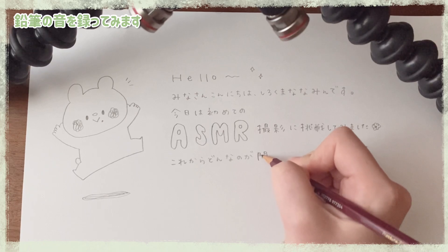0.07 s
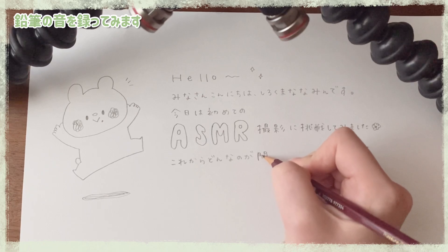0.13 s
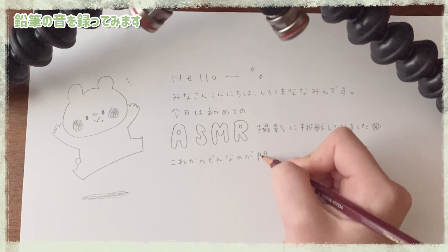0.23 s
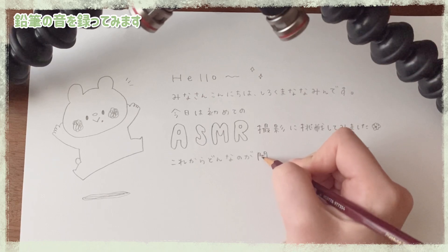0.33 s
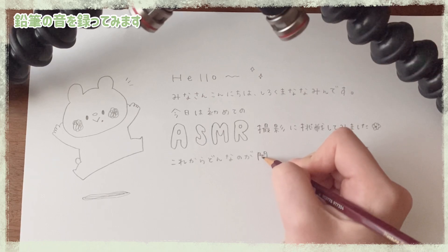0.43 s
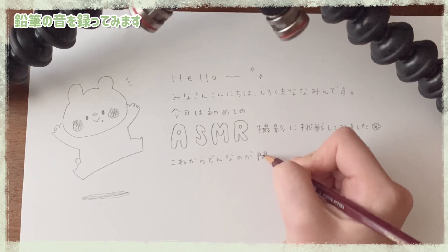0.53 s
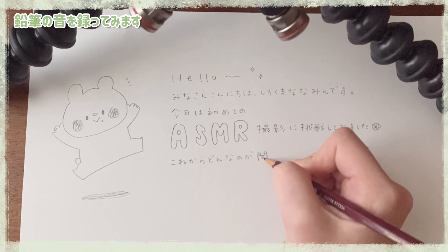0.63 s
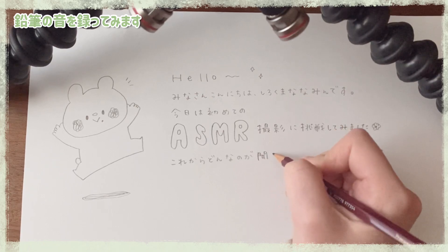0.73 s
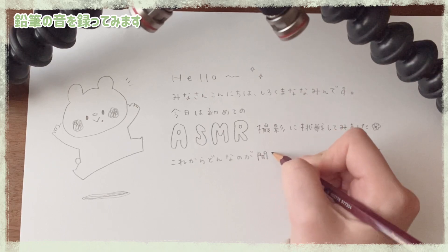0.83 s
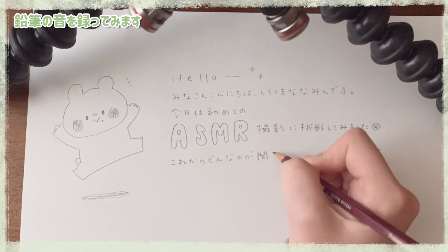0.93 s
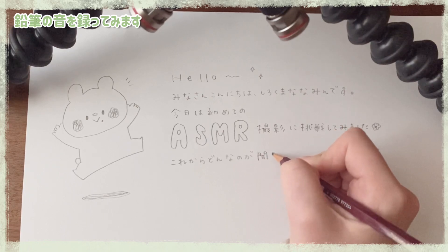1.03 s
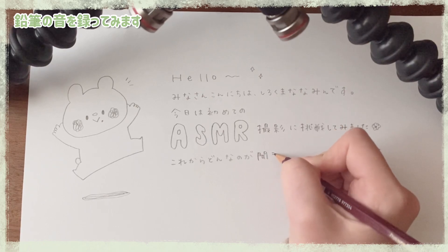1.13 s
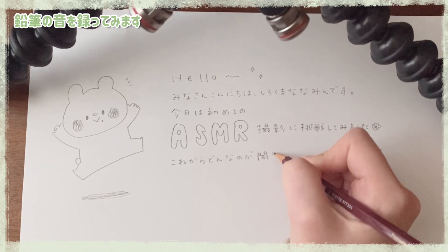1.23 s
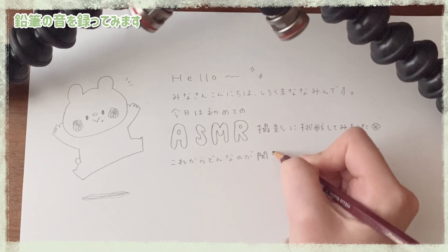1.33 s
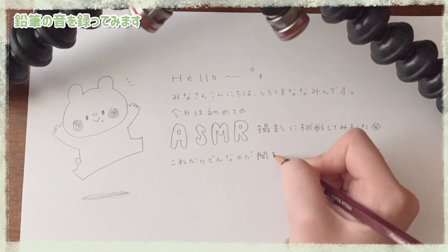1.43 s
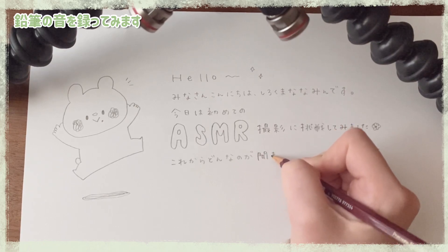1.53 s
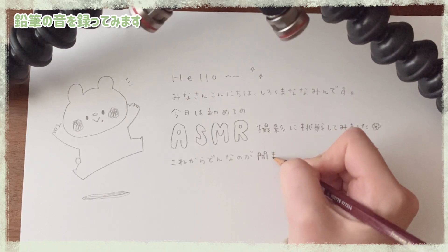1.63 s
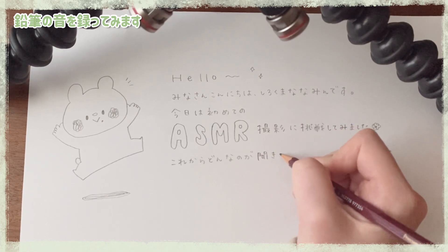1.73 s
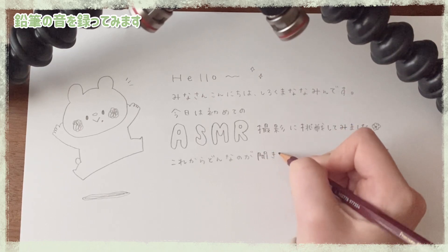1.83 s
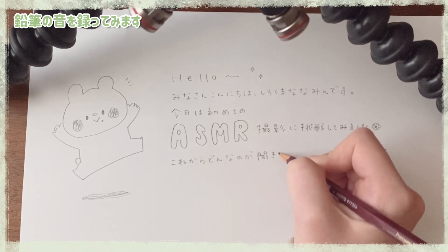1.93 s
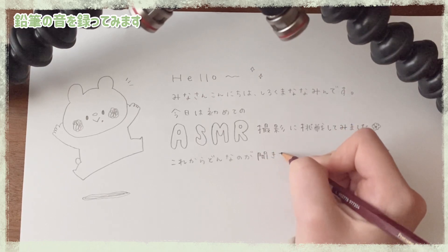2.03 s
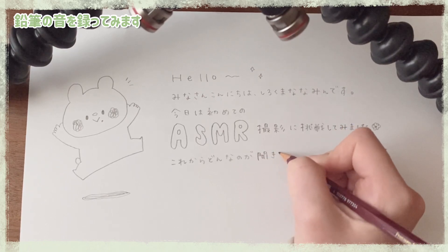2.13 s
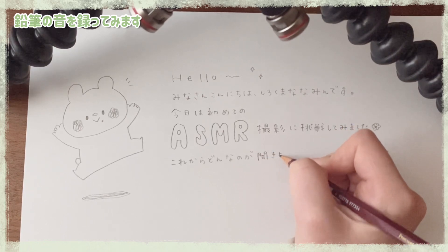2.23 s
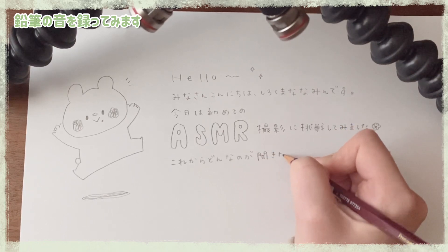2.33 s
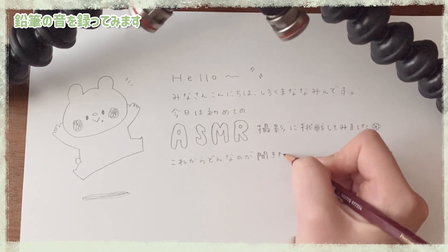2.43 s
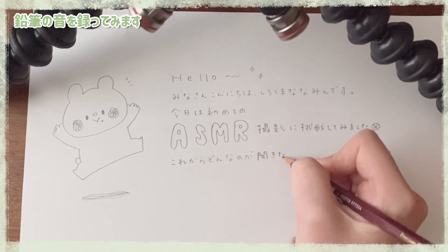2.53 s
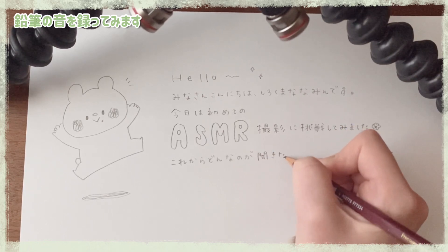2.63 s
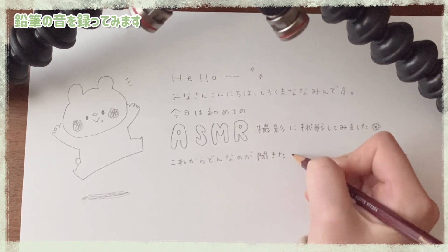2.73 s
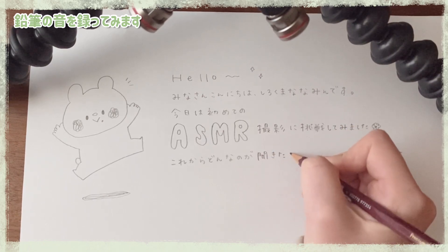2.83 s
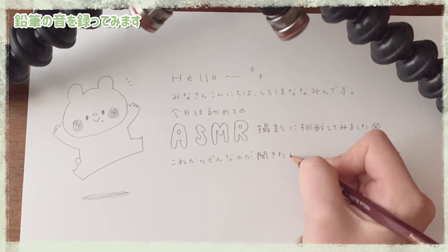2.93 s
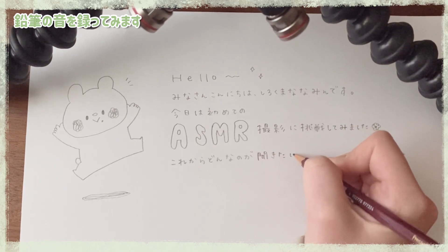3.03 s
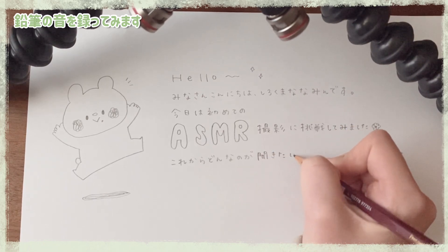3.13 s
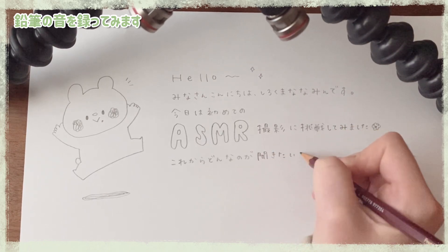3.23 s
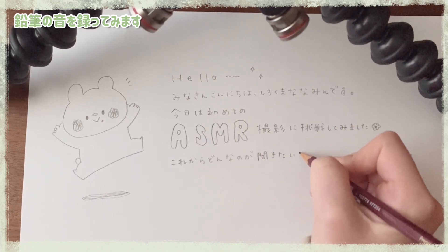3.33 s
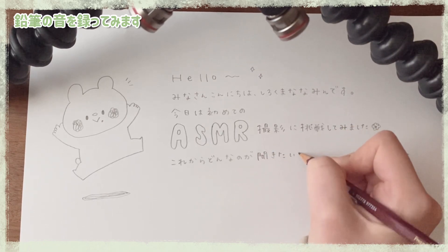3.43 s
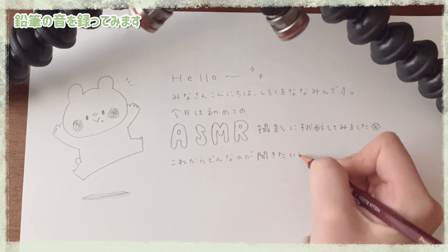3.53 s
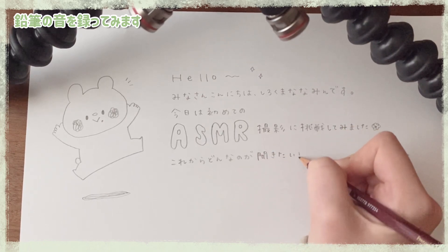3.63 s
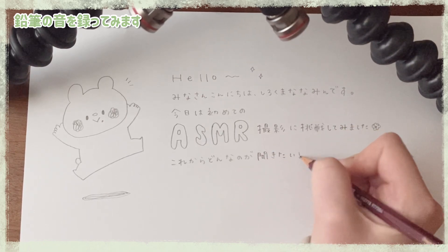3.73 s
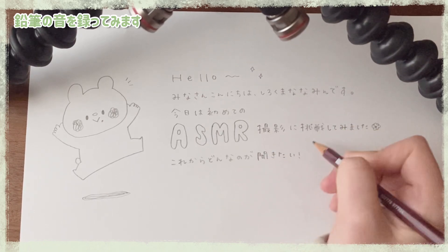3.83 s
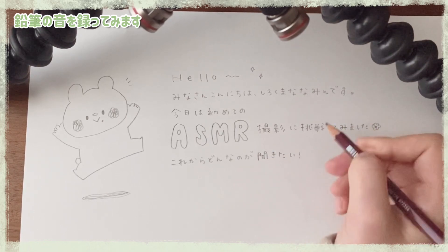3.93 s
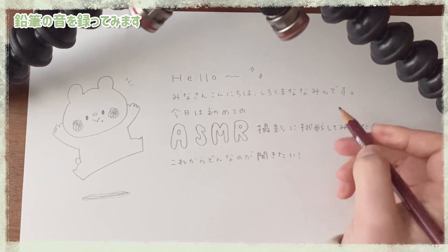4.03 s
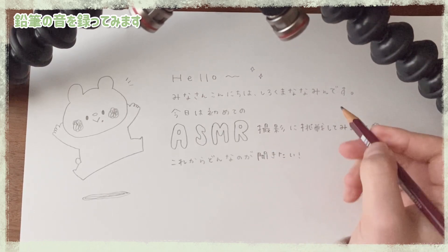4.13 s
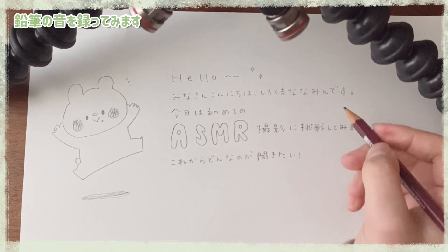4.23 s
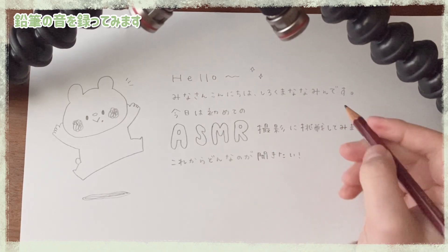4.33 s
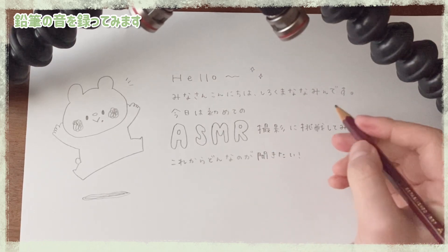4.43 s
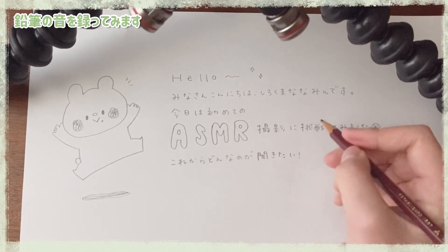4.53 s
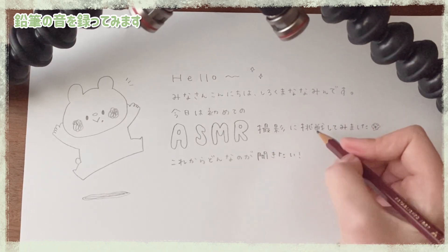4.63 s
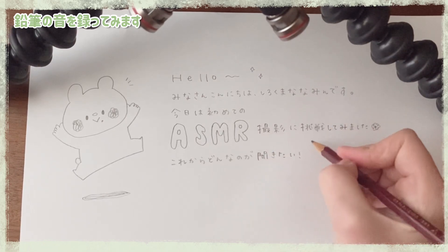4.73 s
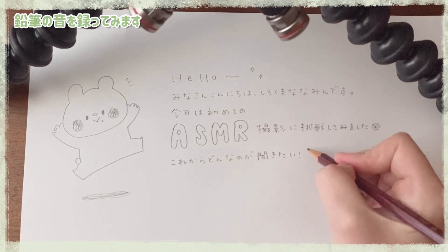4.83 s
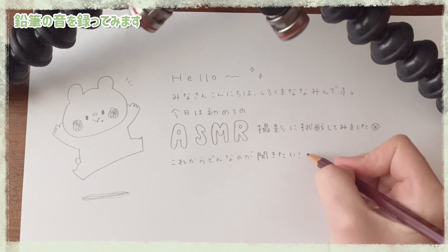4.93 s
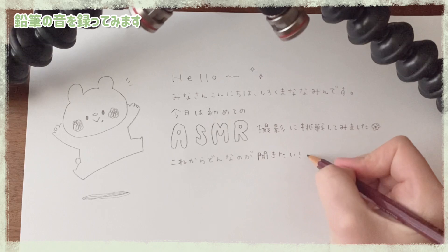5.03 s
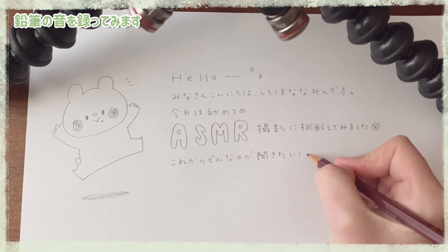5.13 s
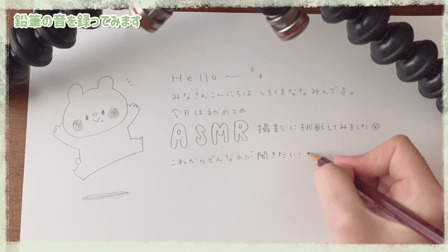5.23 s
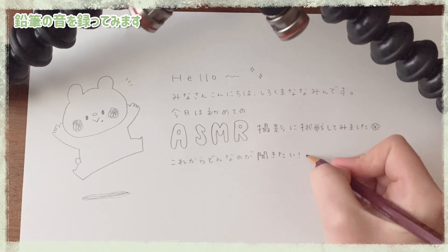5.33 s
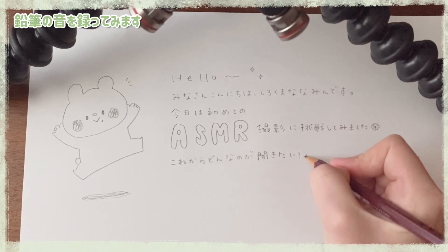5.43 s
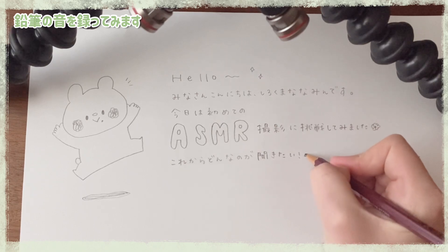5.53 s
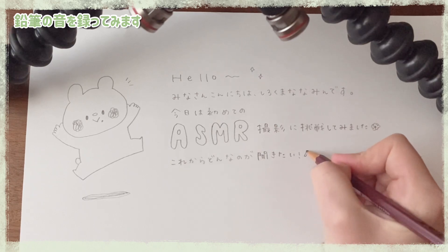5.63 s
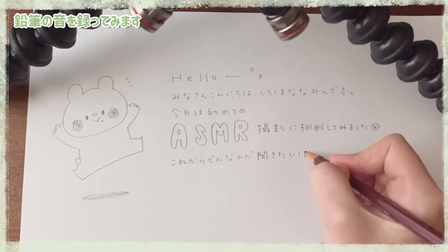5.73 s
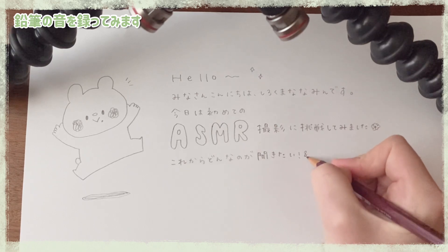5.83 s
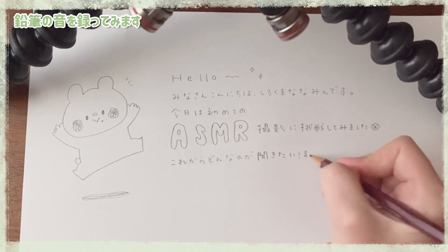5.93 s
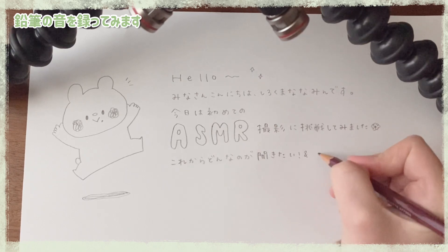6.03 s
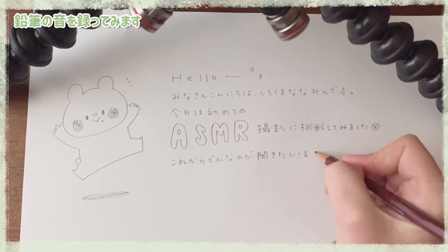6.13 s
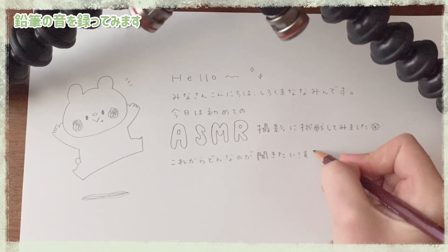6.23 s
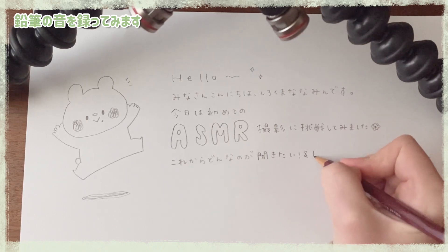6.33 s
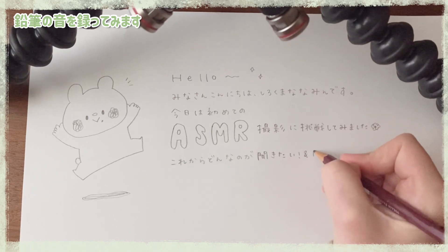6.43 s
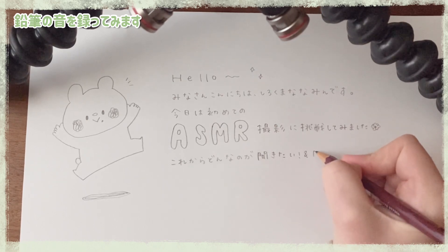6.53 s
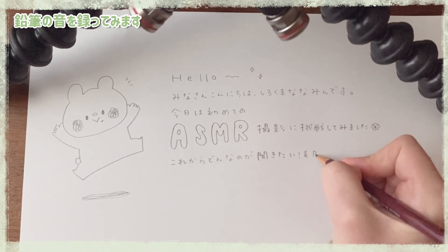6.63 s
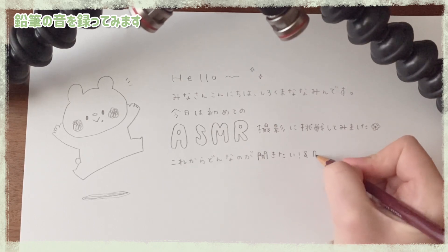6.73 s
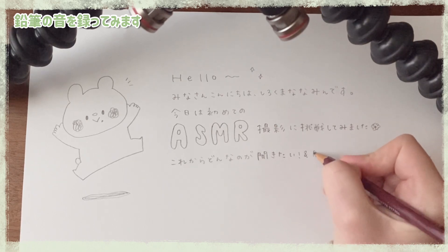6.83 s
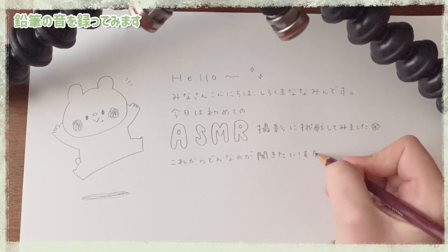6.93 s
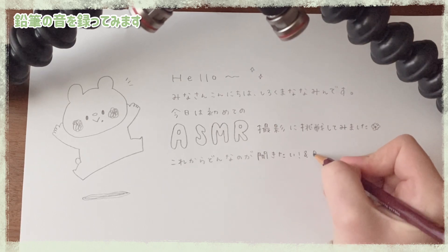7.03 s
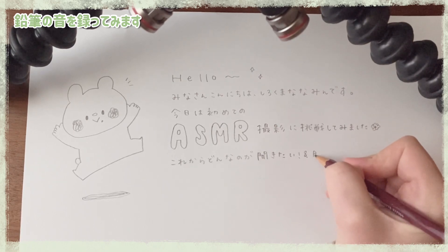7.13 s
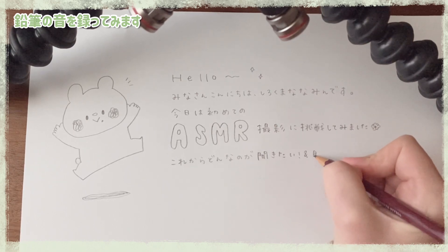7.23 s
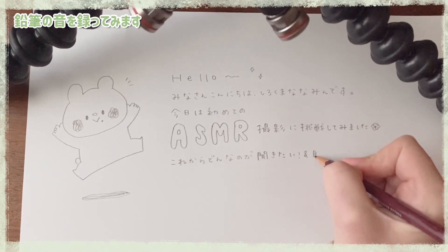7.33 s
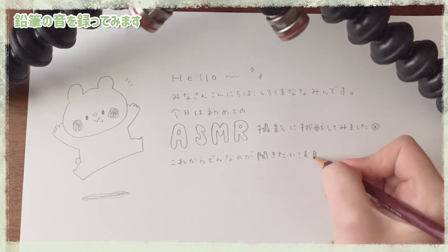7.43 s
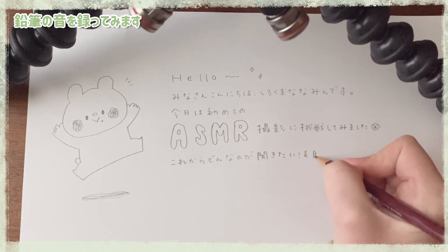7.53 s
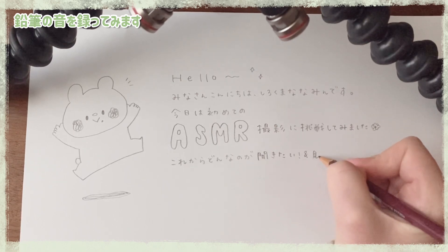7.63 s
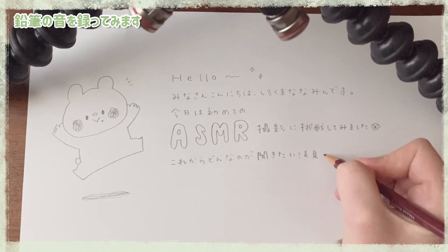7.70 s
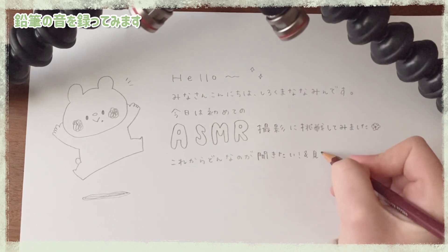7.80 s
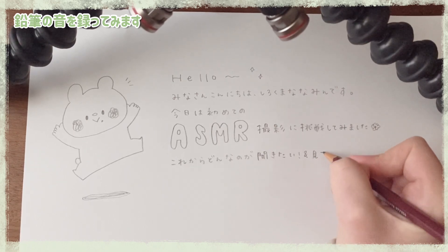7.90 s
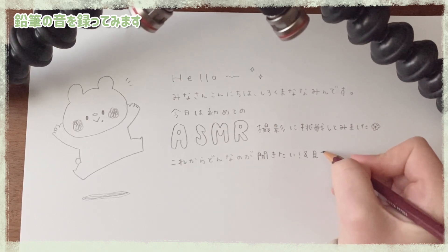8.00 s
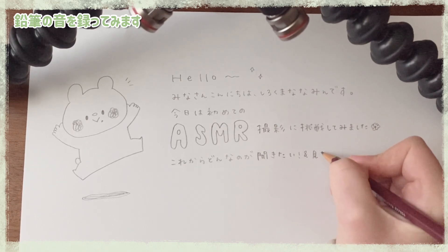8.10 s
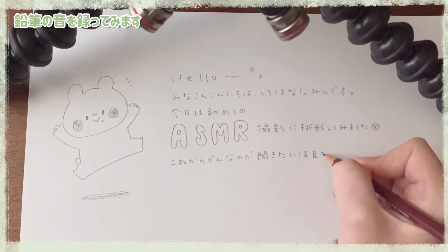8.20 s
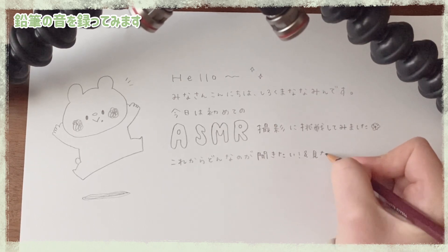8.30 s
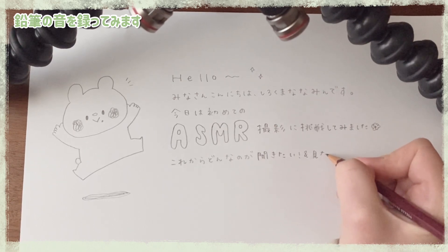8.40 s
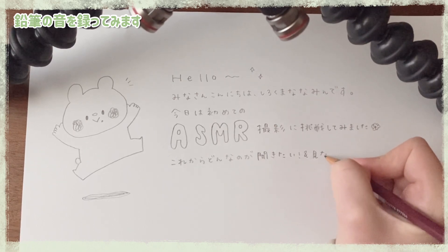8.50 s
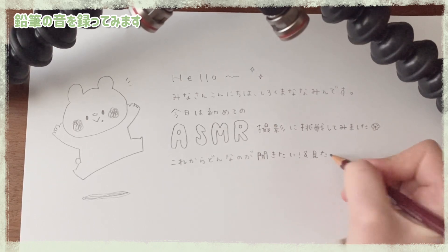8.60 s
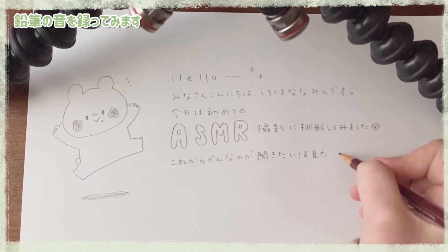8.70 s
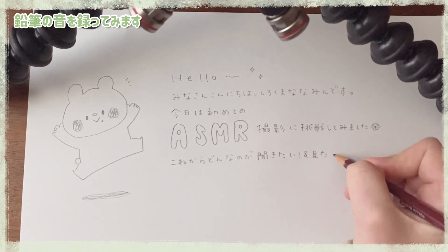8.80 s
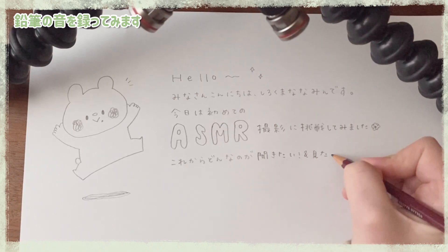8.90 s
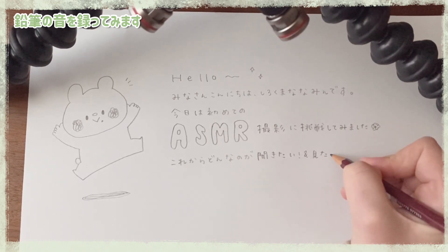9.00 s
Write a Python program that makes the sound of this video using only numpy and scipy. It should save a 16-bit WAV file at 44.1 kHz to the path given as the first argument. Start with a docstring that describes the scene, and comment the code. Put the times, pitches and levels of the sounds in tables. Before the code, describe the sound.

A pencil taps and scratches short strokes on paper, very close, pausing briefly midway while the hand slides softly.

```python
"""A pencil writes small characters on a sheet of paper lying on a desk, between two close microphones.
Most strokes start with the lead knocking on the desk, then scratch over the paper fibres; a few begin
softly, with only the scratch. Between characters the side of the hand slides along the sheet with a
soft hiss. Paper and pencil give off a few tiny ticks, the moving arm makes the desk rumble, and a quiet
room hums behind it all."""
import sys
import numpy as np
from scipy import signal
from scipy.fft import rfft, irfft
from scipy.io import wavfile
from scipy.ndimage import uniform_filter1d

SR = 44100
rng = np.random.default_rng(int(sys.argv[2]) if len(sys.argv) > 2 else 0)


def file_out(sig):
    """Save sig as 16-bit WAV at sys.argv[1]."""
    # one column per channel
    cols = np.atleast_2d(sig).T
    # limit, then scale
    lim = np.clip(cols, -1, 1)
    pcm = np.round(lim * 32767).astype(np.int16)
    wavfile.write(sys.argv[1], SR, pcm)


N = 399546

# Room tone and microphone hiss. Each row: frequency in Hz, relative level in dB.
ROOM_SPECTRUM = [(24, -50), (40, -10), (109, -4.5), (179, -6), (248, -10), (282, -4.5), (410, -11.5),
                 (464, -5.5), (567, -10.5), (912, -14.5), (1330, -22.5), (1540, -19.5), (2030, -23.5),
                 (15800, -30)]
# The rumble of the desk under the arm. Each row: frequency in Hz, relative level in dB.
RUMBLE_SPECTRUM = [(10, -5.5), (22, -1.5), (30, -8.5), (42, -10.5), (60, -17.5), (90, -21), (140, -28.5),
                   (250, -44.5), (600, -72.5)]
# How firmly the arm leans on the desk; it eases off while the pencil is lifted.
# Each row: time in seconds, relative level in dB.
ARM_WEIGHT = [(0.0, -43.5), (2.7, -41.5), (3.15, -38), (3.7, -40.5), (4.15, -54), (5.25, -46.5), (5.8, -47),
              (5.95, -41), (6.5, -46), (7.2, -42), (8.7, -40), (9.06, -50.5)]
# Skin rubbing on paper. Each row: frequency in Hz, left and right relative levels in dB.
SKIN_SPECTRUM = [(150, -2, -10), (513, -23, -22), (800, -8, -9.5), (1050, -5.5, -14.5), (1570, -9.5, -4),
                 (2040, -0.5, -5.5), (2700, -9, -12), (3150, -3, -9.5), (4960, -5, -7.5), (5770, -10, -12),
                 (7840, -8, -9.5), (11300, -13.5, -15), (14900, -19.5, -19.5)]
# The hand brushes along. Each row: start in seconds, length in seconds, relative level in dB.
HAND_SLIDES = [(0.705, 0.089, -51.5), (1.73, 0.087, -45.5), (2.695, 0.11, -45), (3.214, 0.11, -46),
               (3.777, 0.1, -55), (3.87, 0.48, -57), (4.015, 0.16, -54), (4.17, 0.46, -61),
               (4.52, 0.069, -59.5), (4.665, 0.27, -59.5), (5.968, 0.1, -44), (7.662, 0.073, -54.5),
               (8.634, 0.15, -41.5)]
# Small ticks of paper and pencil. Each row: time in seconds, relative level in dB, left minus right in dB.
SMALL_TICKS = [(1.459, -49, -2), (3.016, -33.5, -1), (3.9797, -48, 7), (4.2694, -46, 4), (4.4044, -43, 2.0),
               (4.4288, -48, 1.5), (5.269, -44, 2.5), (6.2208, -43.5, 6), (8.624, -38, 0.5)]
# The bands in which pencil and sheet ring under the sliding lead.
# Each row: centre in Hz, width in Hz, left and right relative levels in dB.
PAPER_RESONANCES = [(906, 420, -1, -3), (1170, 72, -3, -27), (1490, 98, 2.5, -1.5), (2086, 260, 3, 2),
                    (2610, 78, -12, -4), (2060, 7700, -10.5, -10), (3210, 29, -10, -5), (3190, 193, 4, -22),
                    (3890, 210, -8.5, -25), (4450, 350, -6, -6.5), (4870, 260, -3, -7.5),
                    (5250, 410, -15, -7), (6570, 810, -11, -25), (7380, 1450, -7.5, -10),
                    (7710, 950, -5, -14.5), (8800, 2200, -13.5, -28), (10420, 1960, -8, -8.5),
                    (10850.0, 720, -4.5, -18), (11600, 1100, -6, -25), (12700, 1000, -19, -6),
                    (14200, 1300, -6.5, -9), (16000, 2400, -14.5, -42)]
# The desk's modes, the tones it rings with when knocked.
# Each row: frequency in Hz, seconds to fade by 60 dB, left and right relative levels in dB.
DESK_MODES = [(110.8, 0.058, -13.5, -0.5), (138.6, 0.15, -3, -11), (215.2, 0.091, -4.5, -9),
              (290.3, 0.086, -10, -23), (403.2, 0.04, -5, -3.5), (508, 0.21, -35, -37),
              (599, 0.11, -23, -25.5), (703, 0.13, -33.5, -22), (829, 0.045, -7.5, -12.5),
              (905, 0.052, -7, -6.5), (1025, 0.058, -12.5, -22), (1079, 0.076, -29, -25.5),
              (1287, 0.042, -27.5, -20), (1440, 0.039, -22, -14.5), (1960, 0.034, -11, -13),
              (2057, 0.026, -28, -11), (2310, 0.037, -33, -22), (3170, 0.011, 2, -24),
              (3400, 0.013, -7.5, -9), (3920, 0.02, -9, -22)]
# The lead lands. Each row: time in seconds, relative force in dB, contact time in milliseconds.
LANDINGS = [(0.0616, -23.5, 0.38), (0.2308, -26.5, 0.35), (0.4053, -23, 0.24), (0.5664, -27.5, 0.26),
            (0.8905, -23.5, 0.27), (1.0794, -29.5, 0.27), (1.3138, -26.5, 0.23), (1.5889, -22.5, 0.19),
            (1.9281, -24, 0.25), (2.134, -25, 0.3), (2.3486, -19, 0.13), (2.5605, -23.5, 0.33),
            (2.8726, -24.5, 0.23), (3.0993, -20.5, 0.15), (3.417, -24.5, 0.18), (3.6445, -20.5, 0.15),
            (5.3161, -24, 0.28), (6.2396, -23.5, 0.095), (6.4507, -24, 0.165), (6.8554, -20, 0.1),
            (7.0458, -21.0, 0.15), (7.2243, -21.5, 0.13), (7.545, -26, 0.12), (7.8553, -22.5, 0.085),
            (8.0623, -25.5, 0.23), (8.2943, -23, 0.1), (8.499, -21.5, 0.098)]
# The lead is drawn along. Each row: start in seconds, length in seconds, relative level in dB.
PENCIL_STROKES = [(0.083, 0.078, -60), (0.262, 0.052, -59.5), (0.432, 0.058, -57), (0.586, 0.079, -50),
                  (0.915, 0.073, -55.5), (1.097, 0.098, -57.5), (1.361, 0.076, -47), (1.602, 0.11, -56.5),
                  (1.955, 0.084, -54.5), (2.154, 0.08, -48), (2.262, 0.052, -73), (2.382, 0.04, -55.5),
                  (2.573, 0.13, -61), (2.9, 0.077, -49), (3.122, 0.07, -53), (3.443, 0.075, -51),
                  (3.65, 0.074, -62), (5.313, 0.065, -58.5), (5.398, 0.11, -63), (5.52, 0.18, -54),
                  (5.7, 0.094, -61), (5.772, 0.11, -53), (5.897, 0.038, -67), (6.265, 0.092, -47.5),
                  (6.491, 0.086, -60), (6.627, 0.085, -47.5), (6.879, 0.064, -57.5), (7.069, 0.057, -57.5),
                  (7.243, 0.063, -55.5), (7.355, 0.089, -60.5), (7.542, 0.13, -56), (7.885, 0.078, -53.5),
                  (8.116, 0.069, -49), (8.304, 0.078, -58.5), (8.526, 0.075, -53.5)]

TIME = np.arange(N) / SR
FREQ = np.maximum(np.fft.rfftfreq(N, 1 / SR), 1)
SIDES = np.array([[1], [-1]])  # plus for left, minus for right
MEDIUM_DB = -54  # table level of a medium stroke or slide


def undb(db):
    """Turn decibels into a factor to multiply by."""
    return 10 ** (np.asarray(db) / 20)


def colour(points):
    """Join the rows of a spectrum table into a gain at every frequency, one curve per level column."""
    hz, *columns = np.transpose(points)
    return np.array([undb(np.interp(np.log(FREQ), np.log(hz), db)) for db in columns])


def filtered(x, response):
    """Turn each frequency in x up or down by the given response."""
    return irfft(rfft(x) * response, N)


def unit_above(gain, hz):
    """Scale a response so that white noise comes out with an average (rms) level of 1 above hz."""
    return gain / np.sqrt(np.mean(np.abs(gain) ** 2 * (FREQ > hz)))


def causal(gain):
    """Make a filter with this gain that rings only after a blow, never before (minimum phase)."""
    cepstrum = irfft(np.log(gain + 1e-6), N)
    index = np.arange(N)
    return np.exp(rfft(2 * cepstrum * (index < N // 2) - cepstrum * (index == 0)))


def wander(rate_hz):
    """A smooth random curve that typically strays from zero by about 1."""
    x = filtered(rng.standard_normal(N), 1 / (1 + (FREQ / rate_hz) ** 4))
    return x / x.std()


def two_mics(sources, likeness, lag_ms):
    """Mix three signals into stereo: one is shared, lag_ms later on the right; each side gets one more."""
    share = np.clip(likeness, 0, 1)
    delay = np.exp(-2j * np.pi * FREQ * np.array([[0], [lag_ms / 1000]]))
    return filtered(sources[0], np.sqrt(share) * delay) + filtered(sources[1:], np.sqrt(1 - share))


def reflections(wet_db, fade_s):
    """A filter for the short, dense echoes off desk, hand and microphones, different on each side."""
    t = TIME[:SR // 10]
    tail = rng.standard_normal((2, len(t))) * np.exp(-np.log(1000) * t / fade_s) * (t > .001)
    tail = tail / np.sqrt(np.sum(tail ** 2, axis=1, keepdims=True))
    return (1 + undb(wet_db) * rfft(tail, N)) / np.sqrt(1 + undb(wet_db) ** 2)


def movements(table, rise, sharpness, medium_bright_db, bright_per_db):
    """Speed (0 to 1), gain and brightness of moves that speed up for the share `rise`, then slow down."""
    speed, gain, bright_db = np.zeros((3, N))
    for start, length, db in table:
        span = slice(int(start * SR), int((start + length) * SR))
        progress = np.interp((TIME[span] - start) / length, [0, rise, 1], [0, .5, 1])
        arc = np.sin(np.pi * progress) ** sharpness  # below 1: a broad top; above 1: a brief peak
        bright_db[span][arc > speed[span]] = medium_bright_db + bright_per_db * (db - MEDIUM_DB)
        speed[span] = np.maximum(speed[span], arc)
        gain[span] = np.maximum(gain[span], arc * undb(db))
    return speed, gain, bright_db


def fibre_catches(per_second, spread_db):
    """Paper fibres catch and let go at random, making three streams of tiny, uneven clicks."""
    chance = np.clip(per_second / SR, 1e-4, 1)
    size = rng.choice([-1, 1], (3, N)) * undb(spread_db * rng.standard_normal(N))
    clicks = (rng.random(N) < chance) * size / np.sqrt(chance)
    return clicks / clicks.std()


def brightened(x, bright_db, split_hz):
    """A brighter rub has less body below split_hz."""
    body = filtered(x, 1 / (1 + (FREQ / split_hz) ** 4))
    return x - body + body * undb(-bright_db)


def room_tone(air_db, hum_db, hum_hz, hum_width_hz):
    """Quiet room noise with a faint hum; the treble is each microphone's own hiss."""
    air = two_mics(rng.standard_normal((3, N)), 0.5 / (1 + (FREQ / 900) ** 2), lag_ms=0)
    air = filtered(air, unit_above(colour(ROOM_SPECTRUM), 100))
    hum_band = 1 / (1 + ((FREQ - hum_hz) / hum_width_hz) ** 2)
    hum = filtered(rng.standard_normal(N), unit_above(hum_band, 0))
    return undb(air_db) * air + undb(hum_db) * hum


def arm_effort(moves, push_db, landing_db, sway_s, settle_s):
    """The arm works harder with every stroke and slide, and its weight settles after each landing."""
    pushes = sum(np.sqrt(gain / gain.max()) for _, gain, _ in moves)
    sway = uniform_filter1d(pushes, int(sway_s * SR))  # the heavy arm spreads each push out in time
    hardest_db = max(db for _, db, _ in LANDINGS)
    settling = sum(undb(db - hardest_db) * (TIME > start) * np.exp(-np.abs(TIME - start) / settle_s)
                   for start, db, _ in LANDINGS)
    return 1 + undb(push_db) * sway + undb(landing_db) * settling


def arm_rumble(effort, rumble_db, rocking, rocking_hz):
    """The arm rocks the desk and the microphones that stand on it: one rises as the other sinks."""
    weight_db = np.interp(TIME, *np.transpose(ARM_WEIGHT))
    rocking_share = rocking / (1 + (rocking_hz / FREQ) ** 2)
    motion = SIDES * two_mics(rng.standard_normal((3, N)), rocking_share, lag_ms=0)
    rumble = filtered(motion, unit_above(colour(RUMBLE_SPECTRUM), 0))
    return effort * undb(weight_db + rumble_db) * rumble


def small_ticks(sheet, tick_db, decay_s, thin_hz):
    """The sheet or the pencil gives way in a tiny, thin burst of clicks."""
    bursts, t = np.zeros((2, N)), TIME[:SR // 40]
    for start, db, pan_db in SMALL_TICKS:
        i = int(start * SR)
        gain = undb(db + tick_db + SIDES * pan_db / 2)
        bursts[:, i:i + len(t)] += gain * rng.standard_normal(len(t)) * np.exp(-t / decay_s)
    return filtered(bursts, sheet / (1 + (thin_hz / FREQ) ** 3))


def hand_rub(slides, rub_db, grip_db):
    """Skin touches many fibres at once, so it gives a smooth, wide hiss that swells and fades softly."""
    speed, gain, bright_db = slides
    grains = fibre_catches(16000 + 20000 * speed, spread_db=2) * undb(grip_db * wander(rate_hz=62))
    hiss = two_mics(grains, likeness=.1 + 0.47 / (1 + (FREQ / 6000) ** 4), lag_ms=0.091)
    hiss = filtered(hiss, unit_above(colour(SKIN_SPECTRUM), 3500))
    return undb(rub_db) * gain * brightened(hiss, bright_db, split_hz=8500)


def sheet_response():
    """Pencil and sheet ring in bands that colour what the lead does on the paper."""
    power = sum(undb([[left], [right]]) ** 2 / (1 + (2 * (FREQ - hz) / width) ** 2) ** 2
                for hz, width, left, right in PAPER_RESONANCES)
    return unit_above(causal(np.sqrt(power)), 3500)


def desk_rings(build_s, upper_hz, right_lag_s):
    """Each desk tone at each microphone after a downward push; the high ones take a moment to build."""
    hz, fade_s, *sides_db = np.transpose(DESK_MODES)[:, :, None]
    t = TIME[:SR // 4]
    build = 1 - np.exp(-t / build_s) / (1 + (upper_hz / hz) ** 4)
    # Bending waves in the desk reach the right microphone later, the slow low ones most of all.
    lag = np.array([0, right_lag_s])[:, None, None] * np.sqrt(1000 / hz)
    swing = np.cos(2 * np.pi * hz * (t - lag)) * (t >= lag)
    return -undb(sides_db) * build * np.exp(-np.log(1000) * t / fade_s) * swing


def pencil_clicks(sheet, touch_db, press_db, early_s):
    """The lead clicks as it meets the paper, and again a moment later as it presses it onto the desk."""
    clicks = np.zeros(N)
    head_starts = early_s * (.5 + rng.random(len(LANDINGS)))
    for (start, db, contact_ms), ahead in zip(LANDINGS, head_starts):
        clicks[int((start - ahead) * SR)] += undb(db + touch_db) / contact_ms
        clicks[int(start * SR)] += undb(db + press_db) / contact_ms
    return filtered(clicks, sheet * FREQ ** 2 / (FREQ ** 2 + 6000 ** 2))


def pencil_knocks(rings, place_db, cushion_hz, scatter_db):
    """Each landing hits a new spot on the desk, changing the mix of tones; shorter hits sound harder."""
    knocks, t = np.zeros((2, N)), TIME[:SR // 100]
    mixes = undb(place_db * rng.standard_normal((len(LANDINGS), len(DESK_MODES))))
    for (start, db, contact_ms), mix in zip(LANDINGS, mixes):
        push = t * np.exp(-1000 * t / contact_ms)
        ring = signal.fftconvolve(mix @ rings, undb(db) * push[None] / push.sum())
        i = int(start * SR)
        knocks[:, i:i + ring.shape[1]] += ring
    # The paper softens the treble of the blow; many weak, crowded tones add a little rustle.
    cushion = 1 / (1 + 1j * np.sqrt(2) * FREQ / cushion_hz - (FREQ / cushion_hz) ** 2)
    return filtered(knocks, cushion * reflections(scatter_db, fade_s=0.14))


def pencil_scratch(strokes, desk, sheet, scratch_db, drag_db, grip_db):
    """The lead crosses more fibres the faster it goes; its uneven drag also shakes the desk."""
    speed, gain, bright_db = strokes
    grains = fibre_catches(1500 + 9000 * speed, spread_db=-0.5) * undb(grip_db * wander(rate_hz=48))
    grains = two_mics(grains, likeness=0.64 + 0.47 / (1 + (FREQ / 3000) ** 4), lag_ms=0.088)
    scratch = brightened(filtered(grains, sheet), bright_db, split_hz=3550)
    desk_lows = rfft(desk, N) / (1 + (FREQ / 330) ** 2)
    shake = filtered(rng.standard_normal(N), unit_above(desk_lows, 0))
    pressure = speed ** .5 * (gain / gain.max()) ** 0.57
    return undb(scratch_db) * gain * scratch + undb(drag_db) * pressure * shake


def scene():
    """Add up pencil, hand, arm and room at the two microphones."""
    # A brisk stroke is louder and brighter; a light slide of the hand is thinner than a firm one.
    strokes = movements(PENCIL_STROKES, rise=0.28, sharpness=0.79,
                        medium_bright_db=-2.5, bright_per_db=0.52)
    slides = movements(HAND_SLIDES, rise=0.37, sharpness=1.17, medium_bright_db=5, bright_per_db=-0.17)
    rings = desk_rings(build_s=0.00084, upper_hz=776, right_lag_s=.00008)
    sheet = sheet_response() * reflections(wet_db=-3.5, fade_s=0.075)
    knocks = pencil_knocks(rings, place_db=1.92, cushion_hz=4440, scatter_db=-12.5)
    scratch = pencil_scratch(strokes, rings.sum(axis=1), sheet, scratch_db=1.01, drag_db=-45, grip_db=0.5)
    near_echoes = reflections(wet_db=-12, fade_s=.03)
    rub = filtered(hand_rub(slides, rub_db=1.25, grip_db=1.0), near_echoes)
    clicks = pencil_clicks(sheet, touch_db=-30, press_db=-31, early_s=0.0055)
    ticks = small_ticks(sheet, tick_db=-4.5, decay_s=0.0019, thin_hz=6360)
    effort = arm_effort([strokes, slides], push_db=2.0, landing_db=6.5, sway_s=0.12, settle_s=0.076)
    rumble = arm_rumble(effort, rumble_db=3.5, rocking=0.56, rocking_hz=38)
    room = room_tone(air_db=-57, hum_db=-69, hum_hz=283, hum_width_hz=3.5)
    return room + rumble + ticks + rub + clicks + knocks + scratch


def record(dry):
    """Cut away the highest treble, above 15900 Hz."""
    return signal.sosfilt(signal.ellip(10, .2, 70, 15900, fs=SR, output="sos"), dry)


dry = scene()
out = record(dry)
file_out(out)
```